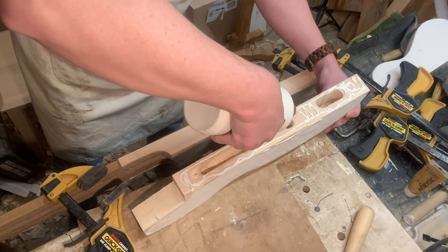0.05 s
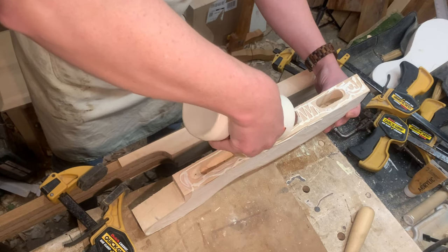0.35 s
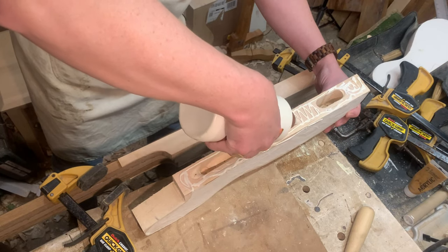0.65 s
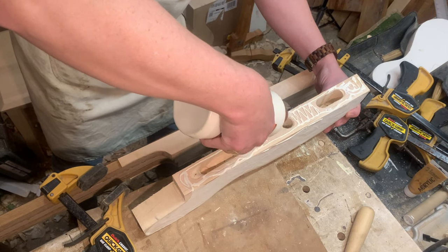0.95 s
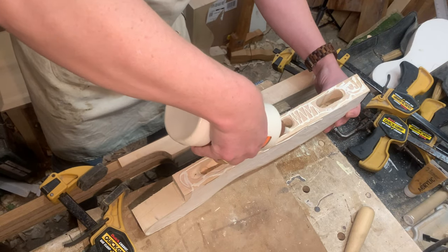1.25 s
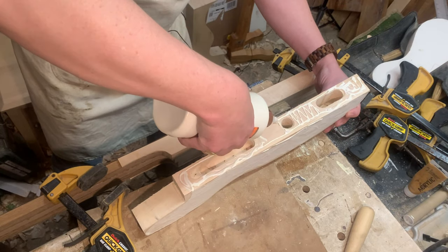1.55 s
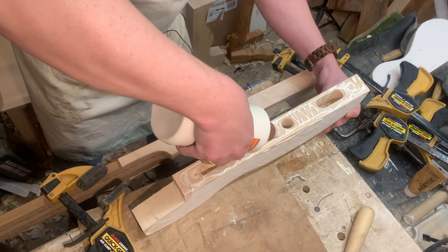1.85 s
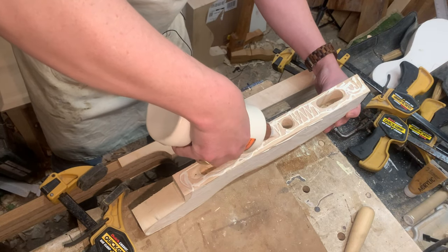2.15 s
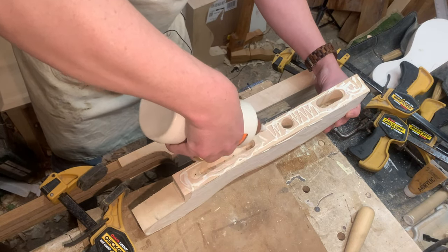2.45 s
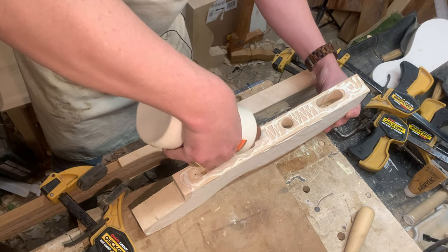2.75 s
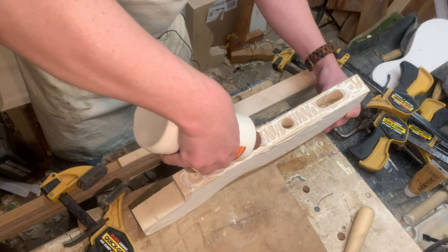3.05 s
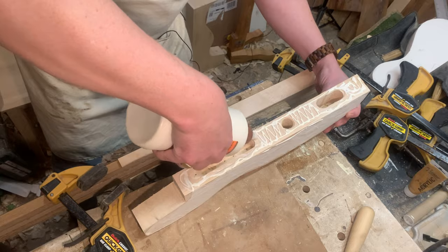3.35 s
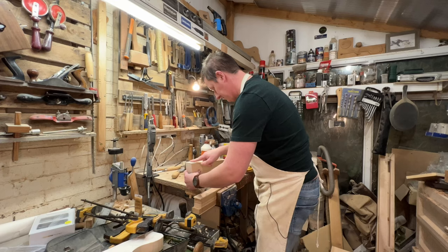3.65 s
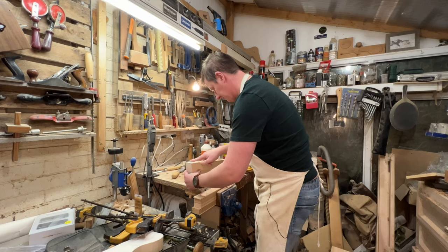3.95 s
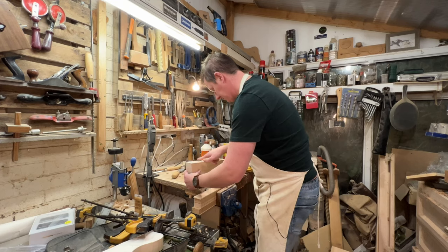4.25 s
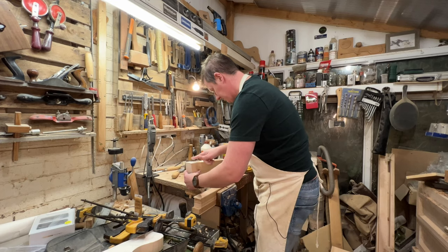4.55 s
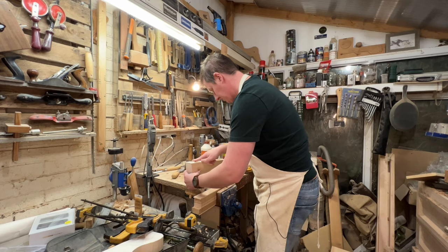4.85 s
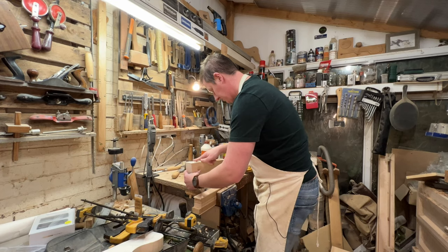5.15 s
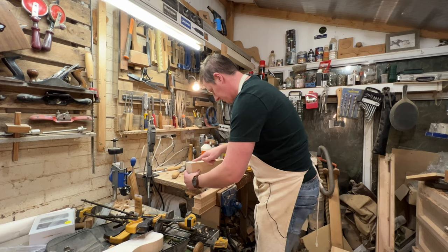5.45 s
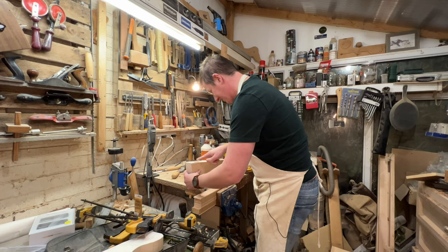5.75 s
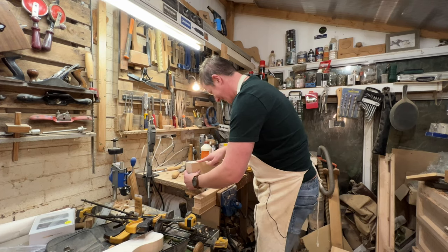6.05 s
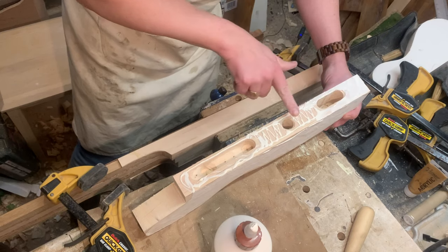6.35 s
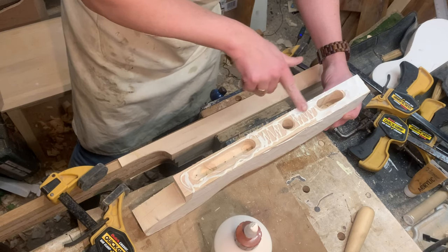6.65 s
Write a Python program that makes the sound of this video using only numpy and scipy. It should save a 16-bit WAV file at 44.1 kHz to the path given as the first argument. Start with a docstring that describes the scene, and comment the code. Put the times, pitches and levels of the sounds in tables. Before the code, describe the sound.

In a small, dull-sounding workshop, an uneven low rumble and gentle hiss lie under quiet gluing. First come short, dry strokes of a nozzle on wood, with little snags. Then the plastic bottle clicks irregularly while sticky glue smears and fizzes. Muffled cloth rustling joins further clicks, and two very faint finger swishes come at the end.

```python
"""A deep, uneven rumble and a soft hiss fill a small workshop throughout. From the start a glue bottle's
nozzle rubs to and fro over a clamped wooden blank: tiny stick-slips ring the wood, and now and then the
tip catches on an edge. Near 3.7 s the level dips and the low room noise grows slightly. The plastic
bottle clicks and tacky glue smears and fizzes; clothes rustle from about 5 s among more clicks, and from
6.35 s a fingertip wipes the glue twice."""
import sys
import numpy as np
from scipy import signal
from scipy.fft import rfft, irfft
from scipy.io import wavfile
from scipy.ndimage import uniform_filter1d

SR = 44100
rng = np.random.default_rng(int(sys.argv[2]) if len(sys.argv) > 2 else 0)


def pcm_store(signal):
    """Save signal as 16-bit PCM."""
    levels = np.round(np.clip(np.atleast_2d(signal), -1, 1) * 32767)
    wavfile.write(sys.argv[1], SR, levels.astype(np.int16).T)


N = 295812
TIME = np.arange(N) / SR


def undb(db):
    """Decibels to gain."""
    return 10 ** (np.asarray(db) / 20)


def unit(x):
    """Scale to rms 1."""
    return x / np.sqrt(np.mean(x ** 2))


def decay(t, t60):
    """Envelope that falls 60 dB in t60 seconds."""
    return np.exp(-np.log(1000) * t / t60)


def colour(x, curve):
    """EQ by a curve of f/Hz, level/dB points."""
    hz, db = np.transpose(curve)
    f = np.maximum(np.fft.rfftfreq(len(x), 1 / SR), 1)
    return irfft(rfft(x) * undb(np.interp(np.log(f), np.log(hz), db)), len(x))


def resonate(x, hz, width):
    """One resonance, gain 1 at its centre."""
    return signal.lfilter(*signal.iirpeak(hz, hz / width, fs=SR), x)


def band(x, lo_hz, hi_hz):
    """Gentle band-pass."""
    sos = signal.butter(2, [lo_hz, min(hi_hz, .45 * SR)], "band", fs=SR, output="sos")
    return signal.sosfilt(sos, x)


def wander(rate):
    """Smooth random modulation at rms 1."""
    hold = int(SR / rate)
    steps = np.repeat(rng.standard_normal(N // hold + 1), hold)
    return unit(uniform_filter1d(steps, hold)[:N])


def gesture(rows, swell_db, fade_db, trim_column=None, ease_s=0.006):
    """Gain envelope: each row eases in, swells to its level (plus an optional trim) and fades."""
    gain = np.zeros(N)
    for row in rows:
        start, rise, fall, db = row[:4]
        peak, end = start + rise, start + rise + fall
        arch_db = np.interp(TIME, [start, peak, end], [-swell_db, 0, -fade_db])
        trim_db = row[trim_column] if trim_column else 0
        gate = np.clip(np.minimum(TIME - start, end - TIME) / ease_s, 0, 1)
        gain = np.hypot(gain, gate * undb(db + arch_db + trim_db))
    return gain


def slips(rate, spread_db, patchy_db):
    """Friction: tiny random slips of uneven size, bunched where the surface catches."""
    happens = rng.random(N) < rate / SR
    size = undb(spread_db * np.minimum(rng.exponential(size=N), 4))
    polarity = rng.choice([-1, 1], N)
    return unit(happens * size * polarity * undb(patchy_db * wander(130)))


# EQ of the sub-bass bed: f/Hz, level/dB
RUMBLE_EQ = [(5, 0.5), (12, 8.5), (22, 4), (33, 0.5), (45, -12.5), (62, -15.5), (85, -41), (160, -49),
             (500, -110)]
# its swells: start t/s, rise t/s, fall t/s, level/dB
RUMBLE_SWELLS = [(0.78, 0.43, 0.29, -38), (1.47, 0.097, 0.15, -35.5), (1.96, 0.053, 0.35, -43),
                 (2.5, 0.38, 0.14, -48.5), (3.02, .33, .4, -40.5), (5.72, 0.062, 0.17, -45),
                 (6.46, 0.09, 0.14, -36)]


def rumble(floor_db=-47):
    """Deep noise, levelled out, swells from a steady floor and sinks back."""
    noise = unit(colour(rng.standard_normal(N), RUMBLE_EQ))
    levelled = noise / np.sqrt(uniform_filter1d(noise ** 2, size=8000))
    return levelled * np.hypot(undb(floor_db), gesture(RUMBLE_SWELLS, swell_db=3.5, fade_db=8.5))


# EQ of the room tone: f/Hz, level/dB
HISS_EQ = [(35, -64.5), (60, -7.5), (107, -16), (124, -15.5), (160, -20.3), (273, -20.7), (353, -30.5),
           (430, -27.3), (563, -31), (690, -30.3), (850, -34), (1220, -38.5), (1850, -40.5), (3310, -43.6),
           (4490, -43.6), (15800, -49.8)]


def hiss(level_db=-61.2):
    """Soft room tone whose low mids waver."""
    air = undb(level_db) * unit(colour(rng.standard_normal(N), HISS_EQ))
    waver = band(air, 130, 1200) * (undb(1.6 * wander(9)) - 1)
    return air + waver


# EQ of the dry scrape on the grain: f/Hz, level/dB
GRAIN_EQ = [(150, -24), (350, -11), (1000, -11), (2200, -26), (6000, -23), (8000, -19), (10000, -11),
            (12300, -7), (16000, -6)]
# where the nozzle rubs: from t/s, place (0 mid length, 1 near the end, 2 between them)
CONTACT_PLACES = [(0, 0), (1.6, 1), (1.95, 2), (2.47, 1)]
# modes of the blank: f/Hz, width f/Hz, then level/dB at places 0, 1 and 2
WOOD_MODES = [(436, 88, 2, 3.5, 3), (693, 47, 8, -3, 5), (1110, 78, 4.5, 8, 7), (1290, 120, -1, -1, 2),
              (1440, 99, -1, -10, -4), (1557, 106, -1.5, 6.5, 7.5), (1746, 42, 13, 7.5, 6),
              (1850, 90, -4, 2, -4), (1942, 50, 4, 2.5, 5), (2160, 45, 4, -12, -2), (2340, 110, -3, -16, 1),
              (2550, 80, 6.5, 7.5, -3), (2690, 130, -5, 3, -3), (2990, 130, 0.5, 6.5, -1),
              (3130, 100, -5, -3, -3), (3420, 130, 0.5, -1, -2), (3680, 130, -9, 1, 0),
              (3830, 120, 0, 5, -1), (4200, 330, -4, -11, -4), (4640, 160, -13, -2, -4),
              (4880, 170, 0.5, -7, -4), (5290, 600, -7, -10.5, -8), (5830, 380, -6, -10, -15),
              (6300, 150, -6, -25, -14), (6860, 330, 0, 0.5, -4)]


def blank(drive):
    """The wood rings under the nozzle; the place of contact weights the modes."""
    starts, places = np.transpose(CONTACT_PLACES)
    place = places[np.searchsorted(starts, TIME, side="right") - 1].astype(int)
    wood = undb(-4) * colour(drive, GRAIN_EQ)
    for hz, width, *place_db in WOOD_MODES:
        wood += resonate(drive * undb(place_db)[place], hz, width)
    return wood


# rubbing strokes: start t/s, rise t/s, fall t/s, relative level/dB, treble trim/dB, body trim/dB
NOZZLE_STROKES = [ (0.038, 0.02, 0.073, -63, -3, -4), (0.145, 0.08, 0.056, -63, -3, -8),
                  (0.228, 0.036, 0.033, -64.5, -1.5, 0), (0.362, 0.081, 0.062, -64, -4.5, -7),
                  (0.548, 0.052, 0.1, -64.5, -2, -23), (0.756, 0.03, 0.039, -67, -1, -2.5),
                  (0.838, 0.026, 0.052, -64.5, -3, -4.5), (0.945, 0.061, 0.13, -67, -2.5, -4.5),
                  (1.266, 0.028, 0.059, -69, -3, -12), (1.368, 0.029, 0.021, -70.5, -13, -2),
                  (1.698, 0.053, 0.065, -71.5, 0, 1), (1.795, 0.04, 0.089, -73.5, -3, -16),
                  (2.06, .09, .22, -66.5, -4, -3), (2.2, .12, .13, -68.5, -12, -1),
                  (2.39, .03, .12, -67, -3.5, -3), (2.48, .098, .097, -64, -2.5, 0),
                  (2.665, .03, .06, -70, -4.5, 0), (2.76, 0.014, 0.079, -64.5, 1.5, -5),
                  (2.885, 0.11, 0.068, -65.5, 0, 0.5), (3.102, 0.01, 0.012, -69, -1, -12),
                  (3.168, 0.032, 0.063, -63, -3, -4), (3.29, 0.046, 0.048, -67.5, -0.5, -3),
                  (3.604, 0.032, 0.025, -73, -3, 0), ]


def nozzle():
    """The tip skips over the grain and the wood rings on; pressing adds body, light gliding treble."""
    friction = slips(rate=4600, spread_db=2, patchy_db=-1.5)
    wood = blank(friction)
    rubbed = blank(friction * gesture(NOZZLE_STROKES, swell_db=7, fade_db=9.5))
    ring = band(rubbed, 1300, 8100) / np.std(band(wood, 1500, 3280))
    pressing = gesture(NOZZLE_STROKES, swell_db=24, fade_db=11.5, trim_column=5)
    gliding = gesture(NOZZLE_STROKES, swell_db=8, fade_db=13, trim_column=4)
    body = unit(band(wood, 227, 740)) * pressing
    treble = unit(band(wood, 6300, 19000)) * gliding
    return undb(3) * body + undb(1.5) * ring + undb(0.5) * treble


# accents where the tip snags: t/s, level/dB, t60/s, low edge f/Hz, high edge f/Hz
EDGE_CATCHES = [(0.231, -56.5, 0.13, 1210, 1450), (0.25, -49, .15, 1300, 3300),
                (0.254, -51.5, 0.2, 500, 1390), (0.666, -60.5, 0.1, 250, 800),
                (0.848, -64, 0.087, 4500, 7500), (1.27, -59, 0.056, 1500, 6000),
                (1.331, -62, 0.082, 193, 314), (1.704, -63.5, 0.092, 1640, 1860),
                (1.706, -67, .06, 2900, 3900), (2.594, -60, 0.13, 300, 1300),
                (2.765, -54, 0.09, 1500, 3400), (2.982, -57, 0.17, 330, 495),
                (3.173, -54.5, 0.07, 1400, 3000), (3.202, -65, 0.019, 2500, 7000),
                (3.605, -52, 0.098, 342, 520), (3.607, -55.5, 0.052, 1400, 1780),
                (3.612, -56.5, .025, 2400, 3870), (3.627, -61, .04, 2520, 3100),
                (3.641, -69, .09, 1500, 2000), (3.994, -58.5, 0.15, 2000, 3500),
                (4.57, -64.5, 0.17, 655, 740)]


def catches(attack_share=0.04):
    """The nozzle judders on an edge, and its grit stirs one range of the wood's modes."""
    out = np.zeros(N)
    t = np.arange(SR // 4) / SR
    grit = slips(rate=1800, spread_db=3, patchy_db=2)
    gritty_wood = blank(grit) + undb(-1) * grit
    for at, db, t60, lo_hz, hi_hz in EDGE_CATCHES:
        span = slice(int(at * SR), int(at * SR) + len(t))
        attack = np.minimum(t / (attack_share * t60), 1)  # long catches swell, short ones bite
        envelope = attack * decay(t, t60)
        judder = band(gritty_wood[span], lo_hz, hi_hz) * envelope
        out[span] += undb(db) * unit(judder) * np.sqrt(np.mean(envelope ** 2))
    return out


# EQ of a soft, muffled texture: f/Hz, level/dB
MUFFLED_EQ = [(50, -17), (130, 11), (250, 3), (450, 8), (720, -5), (1000, -6.5), (1500, -10), (2600, -13),
              (3500, -18), (8000, -28), (16000, -22)]
# its swells (first room noise, the rest clothes): start t/s, rise t/s, fall t/s, relative level/dB
MUFFLED_SWELLS = [(3.7, 0.4, 0.57, -73.5), (5.03, 0.06, 0.3, -65.5), (5.53, 0.16, 0.23, -63),
                  (5.9, 0.26, 0.23, -62), (6.42, 0.23, 0.24, -72.5)]


def room_swell_and_clothes():
    """The low room noise grows slightly from 3.7 s; from about 5 s cloth rustles as the arm lifts away."""
    texture = unit(colour(slips(rate=3500, spread_db=2.5, patchy_db=1.3), MUFFLED_EQ))
    return undb(0.5) * texture * gesture(MUFFLED_SWELLS, swell_db=4.5, fade_db=7.5)


# modes of the plastic wall: f/Hz, level/dB, t60/s
BOTTLE_MODES = [(1090, 0.5, 0.013), (2186, 1, 0.037), (2900, 1.5, 0.0097), (3110, -3, 0.025),
                (3360, 0.5, 0.022), (3520, -7, 0.021), (3900, -5, 0.01), (4440, -6, 0.012), (4690, -5, .02),
                (5340, -7, 0.012), (6000, -10, 0.009)]
# bottle hits: t/s, crack and ring level/dB, knock level/dB, tick level/dB, crack centre f/Hz
BOTTLE_CLICKS = [(3.879, -61, -63, -54.5, 3520), (4.062, -62, -60, -67, 1900),
                 (4.212, -72, -63.5, -64, 2700), (4.289, -66, -64, -58, 2400), (4.304, -72, -69, -53, 2700),
                 (4.557, -65, -75, -61, 3000), (4.584, -82, -81, -60, 3000),
                 (4.749, -61.5, -58.5, -72, 1700), (5.038, -57, -60, -72, 2580),
                 (5.324, -60, -63, -74, 2170), (5.341, -59, -72, -53, 6000), (5.552, -44.5, -59, -60, 3500),
                 (5.637, -69, -64, -57, 2700), (5.673, -59, -63, -60, 2500), (5.685, -62, -61, -74, 2000),
                 (5.709, -61.5, -58.5, -65, 5200), (5.745, -63, -67, -60, 4000)]


def clicks(crack_t60=0.01, knock_t60=0.078, tick_t60=0.0061, crack_span=1.72):
    """Each click cracks and rings the bottle wall, with a hollow knock below and a sharp tick above."""
    t = np.arange(SR // 5) / SR
    out = np.zeros(N + len(t))
    for at, ring_db, knock_db, tick_db, crack_hz in BOTTLE_CLICKS:
        scatter, crack_noise, knock_noise, tick_noise = rng.standard_normal((4, len(t)))
        wall = sum(undb(db + jitter) * np.sin(2 * np.pi * hz * t + np.pi * jitter) * decay(t, t60)
                   for (hz, db, t60), jitter in zip(BOTTLE_MODES, scatter))
        edges = crack_hz / crack_span, crack_hz * crack_span
        crack = unit(band(band(crack_noise, *edges), *edges)) * decay(t, crack_t60)
        ring = crack + undb(-8.5) * wall
        knock = unit(resonate(band(knock_noise, 200, 1500), hz=450, width=450)) * decay(t, knock_t60)
        tick = unit(band(tick_noise, 7100, 17000)) * decay(t, tick_t60)
        start = int(at * SR)
        out[start:start + len(t)] += undb(ring_db) * ring + undb(knock_db) * knock + undb(tick_db) * tick
    return out[:N]


# EQ of the sticky drag: f/Hz, level/dB
DRAG_EQ = [(60, -18), (200, -13), (500, 2.5), (1000, -4.5), (1500, -0.5), (2400, -3.5), (3500, -3.5),
           (5000, -12), (8000, -7.5), (11000, -16)]
# EQ of the bright fizz on top: f/Hz, level/dB
FIZZ_EQ = [(3000, -35), (7500, -18), (9200, -15), (9800, -5), (12300, -4), (16000, -6)]
# wet smears: start t/s, rise t/s, fall t/s, relative level/dB, fizz trim/dB
GLUE_SMEARS = [(3.885, 0.079, 0.09, -67.5, -1), (3.968, .028, 0.062, -64.5, 6),
               (4.18, 0.11, 0.078, -68, -9), (4.29, 0.015, .03, -75, 9), (4.74, 0.071, 0.073, -65, -6),
               (5.04, 0.072, 0.056, -69.5, -8)]


def smears():
    """Tacky glue drags under the nozzle and fizzes as its film tears."""
    drag = unit(colour(slips(rate=6000, spread_db=2.5, patchy_db=1.2), DRAG_EQ))
    drag *= gesture(GLUE_SMEARS, swell_db=17.5, fade_db=26)
    fizz = unit(colour(slips(rate=4000, spread_db=3, patchy_db=2), FIZZ_EQ))
    fizz *= gesture(GLUE_SMEARS, swell_db=27, fade_db=30, trim_column=4)
    return undb(3.5) * drag + undb(7) * fizz


# EQ of skin on glue: f/Hz, level/dB
WIPE_EQ = [(1000, 2), (3000, -7), (4700, -1.5), (6000, -4), (7200, -10), (9000, -11), (15000, -15)]
# wipes: start t/s, rise t/s, fall t/s, level/dB
FINGER_WIPES = [(6.35, 0.102, 0.058, -72.5), (6.61, 0.092, .06, -68.5)]


def fingertip():
    """A fingertip wipes the glue with a faint swish of dense slips."""
    swish = unit(colour(slips(rate=7000, spread_db=2.5, patchy_db=1.2), WIPE_EQ))
    return swish * gesture(FINGER_WIPES, swell_db=3, fade_db=0)


def workshop(x, t60=0.12, wet_db=-11, predelay_s=0.004):
    """The cluttered walls give a short, dull echo."""
    t = np.arange(SR // 3) / SR
    tail = band(rng.standard_normal(len(t)), 110, 6300) * decay(t, t60) * (t > predelay_s)
    return x + undb(wet_db) * signal.fftconvolve(x, tail / np.linalg.norm(tail))[:N]


def scene():
    """Mono mix: the foreground in the room, over a bed of rumble and hiss."""
    foreground = nozzle() + catches() + smears() + clicks() + room_swell_and_clothes() + fingertip()
    return (workshop(foreground) + rumble() + hiss())[None]


def record(dry):
    """The level dips briefly, and a steep low-pass trims the top."""
    dip_at_s, dip_width_s, dip_db = 3.683, 0.014, -25.5
    dip = undb(dip_db * np.exp(-((TIME - dip_at_s) / dip_width_s) ** 2))
    lowpass = signal.ellip(10, .2, 70, 15900, fs=SR, output="sos")
    return signal.sosfilt(lowpass, dry * dip)


dry = scene()
out = record(dry)
pcm_store(out)
```